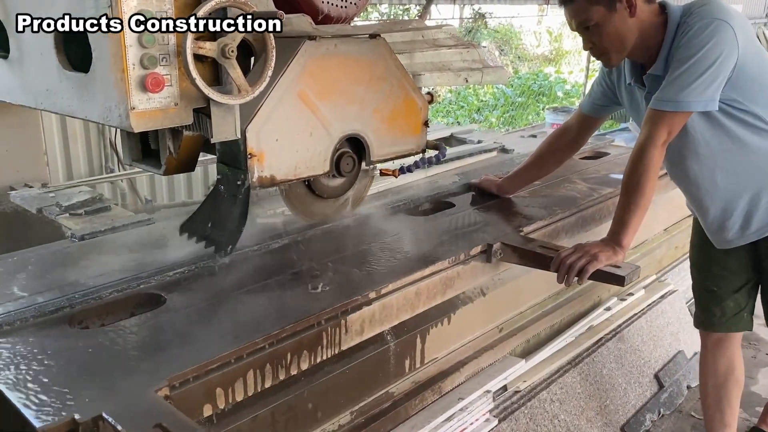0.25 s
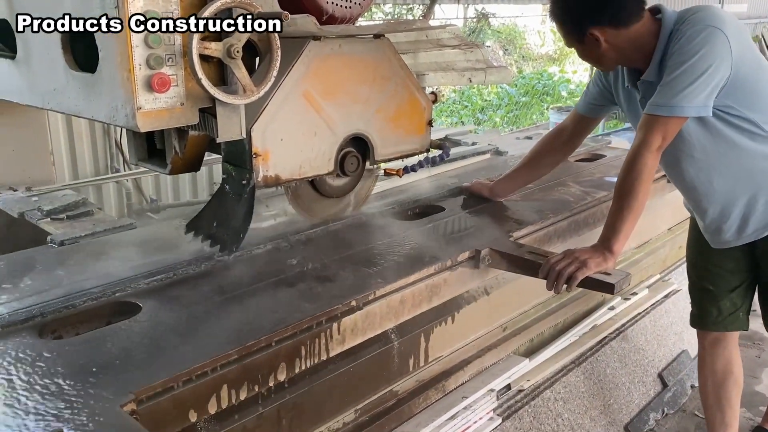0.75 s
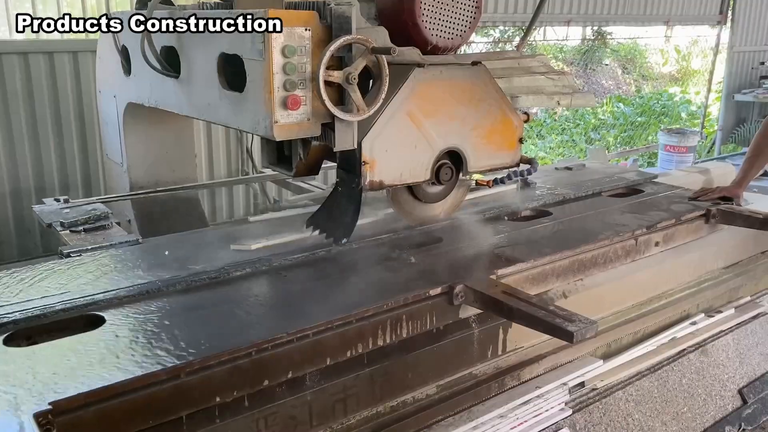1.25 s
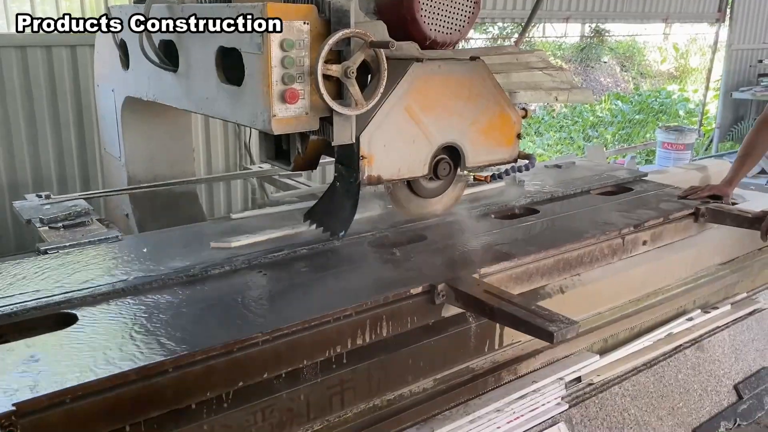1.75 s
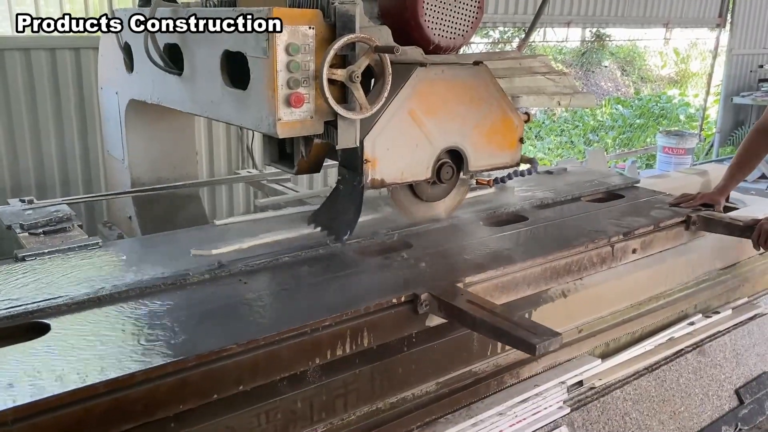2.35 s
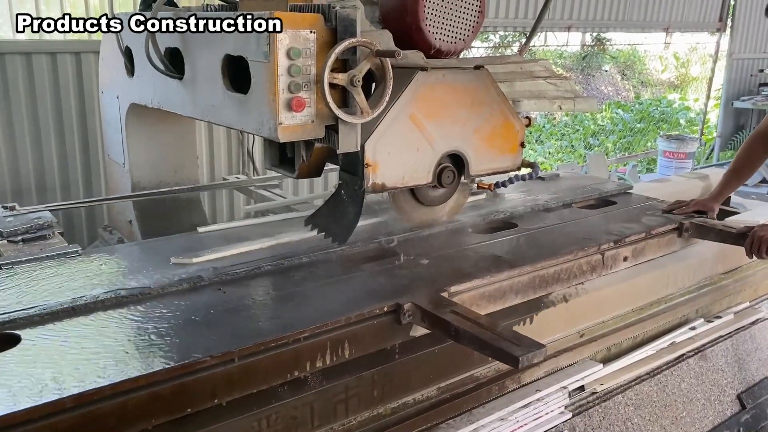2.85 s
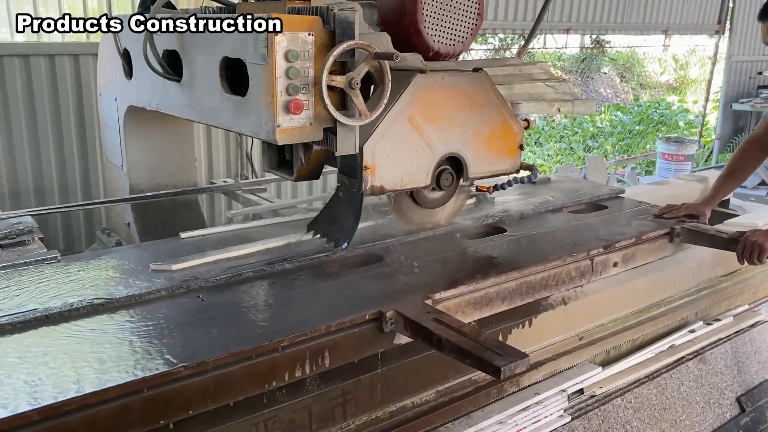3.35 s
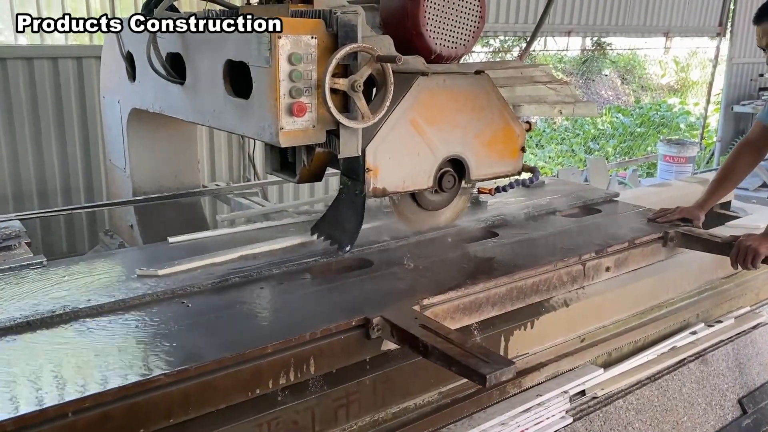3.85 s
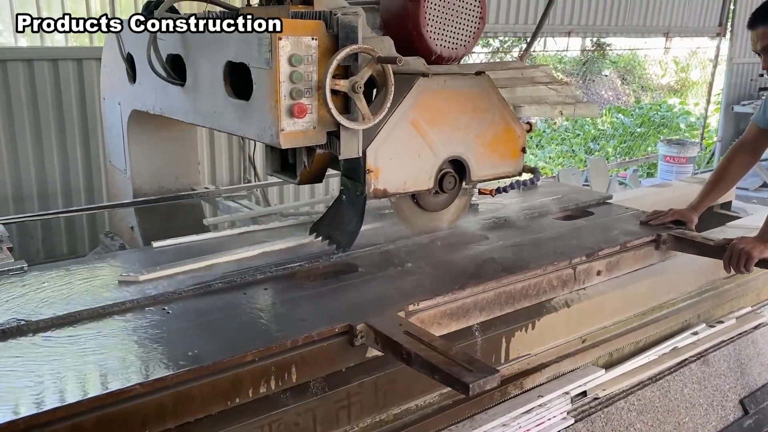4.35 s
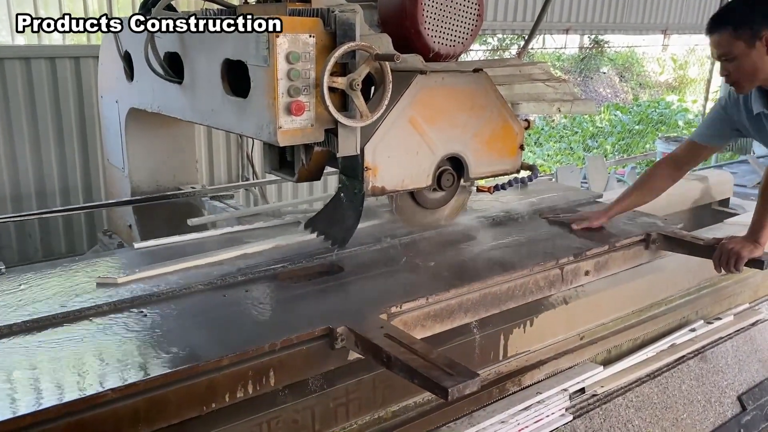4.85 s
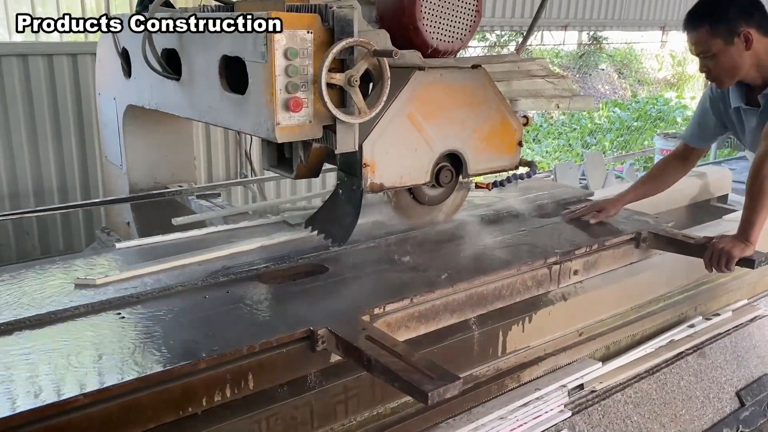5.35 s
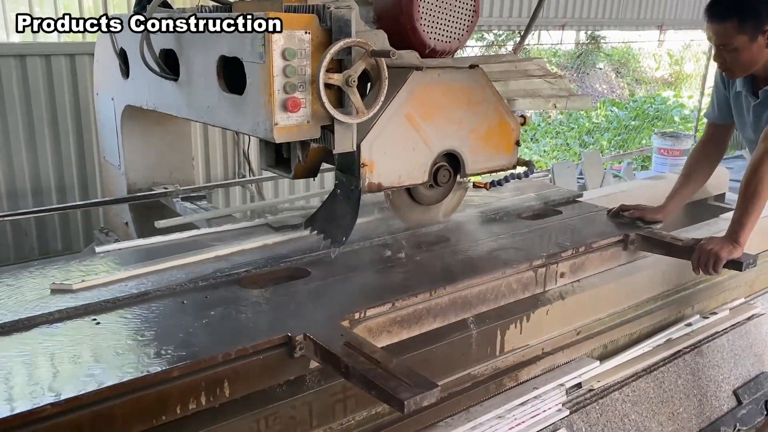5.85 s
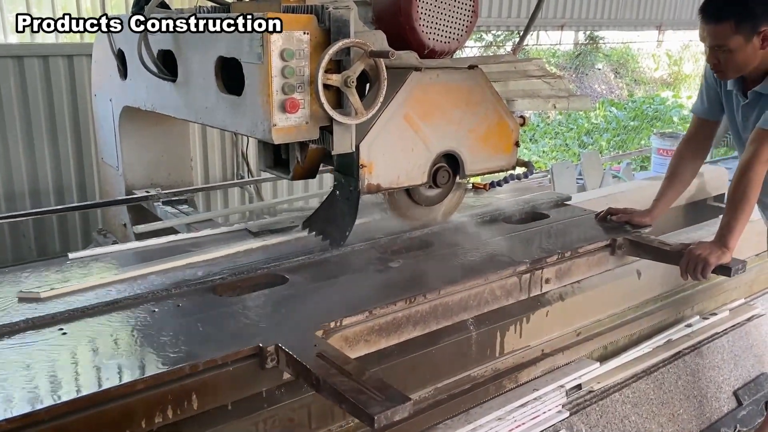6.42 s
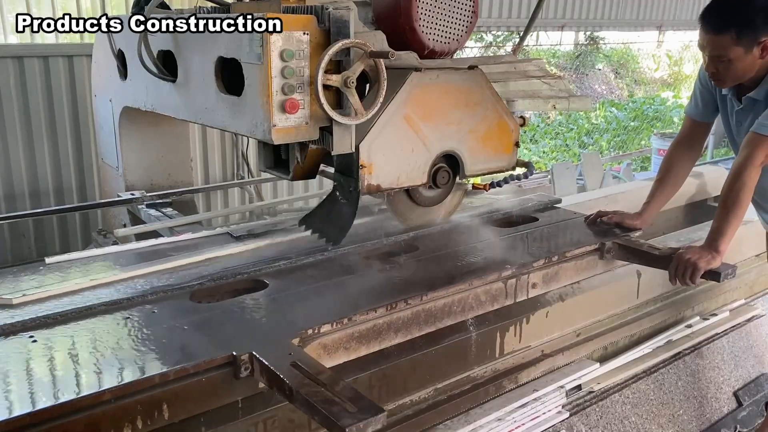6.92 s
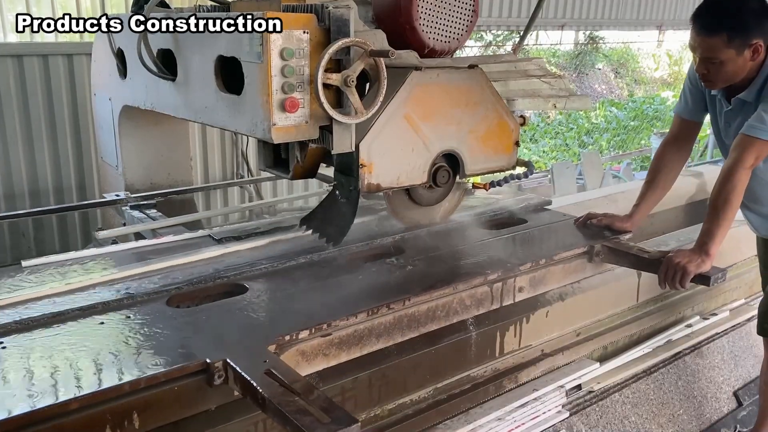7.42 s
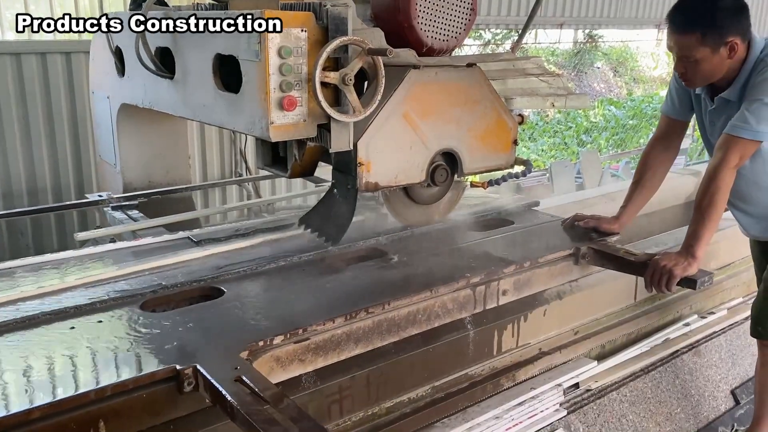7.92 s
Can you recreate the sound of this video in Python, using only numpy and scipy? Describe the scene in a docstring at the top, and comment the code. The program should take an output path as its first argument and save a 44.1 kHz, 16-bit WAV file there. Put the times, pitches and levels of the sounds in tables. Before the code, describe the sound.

Continuous wet stone sawing in an open-sided workshop, heard close and wide in stereo. Abrasive high hiss and water spray cover a weak low drone; the steel blade sings unevenly and a thin motor whine wavers behind. After a tiny dropout at about one second the position changes and the highs soften a little. The bite strengthens around three seconds, relaxes around five, then grows again with altered ringing, still running at the end.

```python
"""In an open workshop, a water-cooled bridge saw grinds through a stone slab, heard from one spot, then a second.
Behind it the frame drones, the motor whines faintly (wavering sines), and chips and drops tick (short noise bursts).
In front, grit and water hiss (shaped noise) and the steel blade rings (noise through narrow resonances), more under load.
The blade beats on the stone about 80 times a second, and shifts once in its slot, which passes the ringing to other modes.
The noise is unrelated at the two ears, so the sound arrives from all around."""
import sys
import numpy as np
from scipy import signal
from scipy.fft import rfft, irfft, next_fast_len
from scipy.io import wavfile
from scipy.ndimage import uniform_filter1d

SR = 44100
rng = np.random.default_rng(int(sys.argv[2]) if len(sys.argv) > 2 else 0)


def master_out(mix):
    """Clip the mix to full scale and print it as 16-bit PCM to the path in sys.argv[1]."""
    frames = np.transpose(np.atleast_2d(mix))
    ceiling = np.clip(frames, -1, 1)
    pcm = np.round(ceiling * 32767).astype(np.int16)
    wavfile.write(sys.argv[1], SR, pcm)


N = 360738  # length in samples

# Levels in the tables are starting points: load, slow wavering and ear balance still act on them.
# Each resonance is passed twice, so its final peak is narrower than the width listed.

# larger stone chips: t/s, size/dB (before the common chip_db and the band filter in ticks)
CHIP_HITS = [(0.0154, -18), (2.1194, -15), (2.2774, -20), (2.3574, -21), (4.9884, -19), (5.3754, -21),
             (7.6264, -21)]
# partials of the motor whine: harmonic number, sideband number, level/dB, change when the blade shifts/dB
WHINE_PARTIALS = [(1, 0, -64, 0), (1, 1, -62, 0), (2, 0, -50.2, 3.2), (2, 1, -46.3, -2.5),
                  (3, 0, -50.2, -1), (4, 1, -53, 5), (5, 0, -57, 0), (5, 1, -51.5, -2)]
# other resonances of frame and blade: f/Hz, width/Hz, level at first spot/dB, level at second spot/dB
MACHINE_MODES = [(205.5, 120, -55, -49.5), (322, 80, -67, -52.0), (468, 120, -50.5, -59.5),
                 (752, 94, -54.5, -57.0), (958, 170, -44.5, -56.5), (1199, 280, -47, -43.4),
                 (1626, 120, -49.5, -55.5), (1845, 220, -50.5, -49.5), (2153, 250, -46, -54),
                 (3172, 130, -38.5, -44), (3302, 130, -44.5, -42.2), (3858, 210, -44, -43),
                 (4200, 200, -45, -44), (4400, 120, -38.3, -47.5), (4670, 280, -47, -43),
                 (5016, 210, -49, -45.0), (5480, 370, -42, -42), (6440, 200, -43, -48.5),
                 (6780, 290, -39, -41), (7450, 660, -37.3, -41.8), (8105, 190, -44.0, -45.5),
                 (8700, 180, -44, -47), (9365, 290, -42, -48), (9940, 220, -41.5, -46.0),
                 (10430, 280, -42, -45), (10770, 650, -41, -42.5), (12250, 580, -44, -40.5),
                 (13045, 310, -49.0, -54), (14095, 800, -49.5, -46.5)]
# broad noise of motor, grit and spray: f/Hz, level at first spot/dB per Hz, level at second spot/dB per Hz
HISS_SPECTRUM = [(25, -90, -90.5), (70, -87, -86.9), (143, -79.5, -83), (300, -72.5, -79.5),
                 (623, -79, -79.0), (1470, -87, -89.5), (2580, -71.5, -75), (2790, -71.5, -70.5),
                 (3320, -64.8, -67.3), (6000, -66, -68), (8300, -73.5, -75), (11500, -74.5, -75.5),
                 (13500, -78.4, -83), (15700, -78.3, -80)]
# slight tone shaping of the grit noise: f/Hz, gain/dB
GRIT_TONE = [(2600, 0), (2920, -1), (3100, -0.94), (6500, -0.6), (7800, 1.6), (9000, 1)]
# narrow bands of noise that swell and die away; those near 7.5 kHz belong to the motor whine:
# start t/s, end t/s, f/Hz, width/Hz, level at the height/dB
PASSING_BANDS = [(0.0, 0.45, 3760, 70, -39), (0.0, 1.15, 455, 41, -55), (0.55, 1.2, 7490, 40, -45.5),
                 (1.0, 1.3, 6830, 70, -47), (1.2, 6.5, 1805, 57, -53.7), (1.3, 4.3, 6470, 240, -45),
                 (1.9, 2.9, 332, 40, -54.5), (1.8, 3.3, 4770, 150, -39.5), (2.5, 5.3, 684, 140, -58.5),
                 (2.5, 4.0, 4640, 70, -43), (3.0, 3.7, 7495, 22, -41.5), (3.9, 4.25, 7495, 22, -46),
                 (3.2, 5.1, 1375, 50, -45), (3.5, 3.7, 8400, 80, -42.5), (3.5, 5.1, 3910, 70, -43),
                 (5.7, 7.8, 463, 70, -55.5), (6.0, 8.1, 3175, 77, -40.8), (6.8, 8.18, 775, 64, -55),
                 (7.0, 7.9, 2210, 420, -48), (7.1, 7.35, 5030, 80, -41), (7.3, 7.55, 5560, 80, -41)]
# leading blade modes: f/Hz, width/Hz, level at first spot/dB, level at second spot/dB,
# change when the blade shifts/dB
LEADING_MODES = [(1076, 90, -47.9, -42.6, 1.8), (1371, 57, -38.1, -42.6, -6.3),
                 (3486, 100, -39.3, -42.3, 5.4)]
# how hard the blade bites as the slab is fed in: t/s, load/dB
FEED_LOAD = [(1.2, -0.15), (1.25, -0.3), (2.0, -0.2), (2.8, 0.55), (4.0, -0.1), (5.1, -0.7), (5.8, -0.6),
             (6.7, 0.45), (8.18, 0.3)]
# balance between the ears, one table per spot: f/Hz, left minus right level/dB
EAR_BALANCE = [
    [(60, -0.5), (99, 1.0), (160, 2.5), (270, 1.5), (450, 7), (740, 0.5), (1220, 3), (2010, 3.0),
     (3330, 2.0), (5500, 4), (9080, -1), (15000, -0.5)],
    [(60, -1), (92, 3.5), (140, 4), (210, 6), (330, 2), (500, 0.5), (770, 0.5), (1170, 0), (1790, 3),
     (2740, 0.5), (4190, 1.5), (6410, 1.0), (9810, -1), (15000, 0.5)],
]
# brief dip in level between the two spots: t/s, gain/dB
LEVEL_DIP = [(1.189, 0), (1.193, -7), (1.195, -22), (1.213, -21), (1.216, 0)]

MOVE_S = 1.204  # the second spot begins
BEAT_HZ, WHINE_HZ = 80.6, 1481.8  # at the motor's usual speed
SAG_HZ_PER_DB, SHIFT_SAG_HZ = 1.0, 2.3  # the whine sags with load, and once more when the blade shifts
SHIFT_S, SHIFT_LASTS_S = 5.8, 0.4  # middle and length of the blade's shift
SPRAY_FOLLOWS, SINGING_FOLLOWS, WHINE_FOLLOWS = 0.4, 1.3, 2.5  # dB of rise for one dB of load
BUILD_S, BUILD_DB = 1.7, 3.6  # at the second spot the singing starts this much quieter and builds up
FRAME_TOP_HZ = 850  # modes below belong to the frame, those above to the blade
SPRAY_FROM_HZ = 8500  # blade modes from here up follow the spray instead of the bite
CUTOFF_HZ = 15700


def from_db(db):
    """Turn decibels into a gain."""
    return np.exp(np.asarray(db) * (np.log(10) / 20))


def rms_one(x):
    """Scale to an average strength (rms) of 1."""
    return x / np.sqrt(np.mean(x ** 2) + 1e-20)


def in_time(rows, t):
    """Read each column of a time table at the times t, joining its points with straight lines."""
    s, *columns = np.transpose(rows)
    return [np.interp(t, s, column) for column in columns]


def coloured(x, hz, db):
    """Make some pitches louder than others, by a gain curve drawn over log frequency."""
    size = next_fast_len(x.shape[-1] + 4096)
    f = np.maximum(np.fft.rfftfreq(size, 1 / SR), 1)
    gain = from_db(np.interp(np.log(f), np.log(hz), db))
    return irfft(rfft(x, size) * gain, size)[..., :x.shape[-1]]


def drift(t, rate):
    """Smooth random wandering of rms 1: noise smoothed twice, with about `rate` new values a second."""
    r = np.exp(-2 * np.pi * rate / 1000)
    # drawn at 1000 points a second; the start-up of the smoothing is thrown away
    slow = signal.lfilter([1], [1, -2 * r, r * r], rng.standard_normal(12000))[3000:]
    return np.interp(t * 1000, np.arange(len(slow)), rms_one(slow))


def resonance(x, hz, width):
    """Two equal peak filters in a row let only a narrow band ring, scaled to rms 1."""
    section = np.concatenate(signal.iirpeak(hz, hz / width, fs=SR))
    return rms_one(signal.sosfilt([section, section], x))


def white(t):
    """Noise with all pitches equally strong, unrelated at the two ears."""
    return rng.standard_normal((2, len(t)))


def sustained(x, hz, evenness):
    """A steadily driven mode limits its own swing, so it rings more evenly than filtered noise."""
    power = uniform_filter1d(x ** 2, size=round(2 * SR / hz), axis=-1)  # averaged over two cycles
    return rms_one(x / (np.abs(power) + 0.02) ** (evenness / 2))


def load_db(t):
    """How hard the blade bites at the times t."""
    return in_time(FEED_LOAD, t)[0]


def shifted(t):
    """Goes from 0 to 1 as the blade shifts in the slot."""
    return np.clip((t - SHIFT_S) / SHIFT_LASTS_S + 0.5, 0, 1)


def speed(t):
    """Motor speed as a share of its usual speed; load and the drag of the shifted blade slow it a little."""
    return 1 - (SAG_HZ_PER_DB * load_db(t) + SHIFT_SAG_HZ * shifted(t)) / WHINE_HZ


def beating(t, depth, sharpness):
    """Gain of the blade's contact: one short surge of power in each beat, at a rate tied to the motor's speed."""
    beats = BEAT_HZ * np.cumsum(speed(t)) / SR
    surge = np.exp(sharpness * (np.cos(2 * np.pi * beats) - 1))
    return rms_one(np.sqrt(1 + depth * surge))


def ticks(t, per_s=22, grain_db=-41, spread_db=2.5, chip_db=-11, decay_s=0.0012):
    """Chips and drops hit guard and slab: very short bright noise bursts, many small and a few large."""
    sizes = from_db(grain_db + spread_db * np.minimum(rng.exponential(1, N), 3))
    hits = sizes * (rng.random(N) < per_s / SR)
    for s, size_db in CHIP_HITS:
        hits[round(s * SR)] = from_db(size_db + chip_db)
    # every hit dies away exponentially
    envelope = signal.lfilter([1], [1, -np.exp(-1 / (decay_s * SR))], hits + 1e-18)
    band = signal.butter(2, [3200, 12000], "band", fs=SR, output="sos")
    return signal.sosfilt(band, envelope * white(t))


def whine(t, waver_db=2.3, blur_hz=2.1):
    """Motor harmonics, some one beat rate higher, grow with load; each wavers on its own way to each ear."""
    run_s = np.cumsum(speed(t)) / SR
    effort_db = WHINE_FOLLOWS * load_db(t)
    shift = shifted(t)
    out = np.zeros((2, len(t)))
    for harmonic, sideband, level_db, change_db in WHINE_PARTIALS:
        turns = (harmonic * WHINE_HZ + sideband * BEAT_HZ) * run_s
        height = np.sqrt(2) * from_db(level_db + effort_db + change_db * shift)
        for ear in range(2):
            wobble = np.cumsum(blur_hz * np.sqrt(harmonic) * drift(t, 13.8)) / SR
            waver = from_db(waver_db * drift(t, 3))
            out[ear] += height * waver * np.sin(2 * np.pi * (turns + wobble))
    return out


def machine_mode(t, spot, row, wander_db=0.9):
    """One resonance of the machine, rung by noise, and its slowly wandering gain."""
    hz, width, *level_db = row
    mode = resonance(white(t), hz, width)
    return mode, from_db(level_db[spot] + wander_db * drift(t, 0.64))


def frame_drone(t, spot):
    """The low modes of the frame drone on, a little more evenly than plain filtered noise."""
    drone = 0
    for row in MACHINE_MODES:
        if row[0] < FRAME_TOP_HZ:
            mode, gain = machine_mode(t, spot, row)
            drone = drone + sustained(mode, row[0], evenness=0.24) * gain
    return drone


def bite_and_spray(t, chatter_db=0.75, flutter_db=0.52, splash_db=0.55, slosh_db=0.15, spray_share=0.25):
    """Gains of cut and water: chatter and feed make the bite uneven; the water follows it a little and splashes."""
    chatter = chatter_db * resonance(rng.standard_normal(len(t)), 91, 110)
    unsteady_db = chatter + flutter_db * drift(t, 17)
    bite = from_db(load_db(t) + unsteady_db)
    water_db = splash_db * drift(t, 23) + slosh_db * drift(t, 3)
    spray = from_db(SPRAY_FOLLOWS * load_db(t) + spray_share * unsteady_db + water_db)
    return bite, spray


def hiss(t, spot):
    """Broad noise split in two: grit fills the middle, with its tone slightly shaped; water spray fills the top."""
    hz, *density_db = np.transpose(HISS_SPECTRUM)
    noise = coloured(white(t), hz, density_db[spot]) * np.sqrt(SR / 2)  # makes the table's dB count per Hz
    top = coloured(noise, [7000, 10000], [-30, 0])
    grit = coloured(noise - top, *np.transpose(GRIT_TONE))
    return grit, top


def blade_modes(t, spot, bite, spray, flicker_db=1.1):
    """The many lesser modes of the blade ring and flicker with the bite, the highest ones with the spray."""
    ringing = 0
    for row in MACHINE_MODES:
        if row[0] >= FRAME_TOP_HZ:
            mode, gain = machine_mode(t, spot, row)
            flicker = from_db(flicker_db * drift(t, 14))
            ringing = ringing + mode * gain * flicker * (bite if row[0] < SPRAY_FROM_HZ else spray)
    return ringing


def grinding(t, spot):
    """Frame drone, ringing blade and hiss at one spot; all but the drone surge with the blade's beats."""
    bite, spray = bite_and_spray(t)
    grit, top = hiss(t, spot)
    cut = (blade_modes(t, spot, bite, spray) + grit * bite) * beating(t, depth=0.22, sharpness=2.2)
    water = top * spray * beating(t, depth=0.2, sharpness=2.5)
    return frame_drone(t, spot) + cut + water


def brief_rings(count=220, low_hz=3150, high_hz=11500, width_hz=21, level_db=-50.3, spread_db=2.5,
                fall_db=7.0, length_s=0.3):
    """Single grains catch and set high blade modes ringing for a moment: rows like those of PASSING_BANDS."""
    when, place, lasting, size = rng.random((count, 4)).T
    start = when * N / SR - length_s / 2
    end = start + length_s * (0.5 + lasting)
    hz = low_hz * (high_hz / low_hz) ** place
    width = width_hz * hz / low_hz
    # higher rings are weaker; a few come out much stronger than the rest
    height_db = level_db - fall_db * place - spread_db * np.log(np.maximum(size, 0.05))
    return list(zip(start, end, hz, width, height_db))


def passing_bands(t):
    """Narrow bands of noise swell and die away: the listed ones (near 7.5 kHz, motor whine) and the brief rings."""
    out = np.zeros((2, len(t)))
    for start, end, hz, width, level_db in PASSING_BANDS + brief_rings():
        on = slice(*np.searchsorted(t, [start, end]))
        if len(t[on]):
            swell = np.sqrt(np.abs(np.sin(np.pi * (t[on] - start) / (end - start))))
            band = sustained(resonance(white(t[on]), hz, width), hz, evenness=0.37)
            out[:, on] += from_db(level_db) * swell * band
    return out


def singing(t, spot, waver_db=0.6):
    """Friction keeps the leading blade modes ringing almost evenly; they follow the load, and each beat nudges them."""
    drive_db = SINGING_FOLLOWS * load_db(t)
    if spot == 1:
        drive_db = drive_db - BUILD_DB * np.clip(1 - (t - MOVE_S) / BUILD_S, 0, 1)
    out = 0
    for hz, width, *level_db, change_db in LEADING_MODES:
        gain = from_db(level_db[spot] + drive_db + change_db * shifted(t) + waver_db * drift(t, 3))
        out = out + gain * sustained(resonance(white(t), hz, width), hz, evenness=0.94)
    return out * beating(t, depth=0.8, sharpness=9.8)


def scene():
    """The two spots one after the other, with whine, passing bands and ticks running through both."""
    t = np.arange(N) / SR
    parts = []
    for spot, span in enumerate(np.split(t, [round(MOVE_S * SR)])):
        left, right = grinding(span, spot) + singing(span, spot)
        hz, lean_db = np.transpose(EAR_BALANCE[spot])
        parts.append([coloured(left, hz, lean_db / 2), coloured(right, hz, -lean_db / 2)])
    saw = np.concatenate(parts, axis=1)
    tones = (whine(t) + passing_bands(t)) * from_db([[1.0], [-1.5]])  # left ear, right ear
    return (saw + tones + ticks(t)) * from_db(in_time(LEVEL_DIP, t)[0])


def record(dry):
    """A steep low-pass filter takes away the very top of the sound."""
    return signal.sosfilt(signal.ellip(12, 0.1, 80, CUTOFF_HZ, fs=SR, output="sos"), dry)


dry = scene()
out = record(dry)
master_out(out)
```